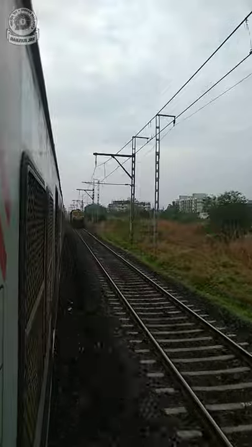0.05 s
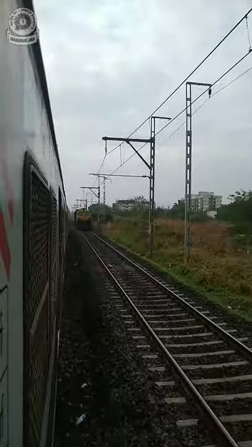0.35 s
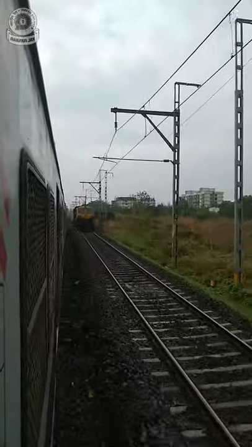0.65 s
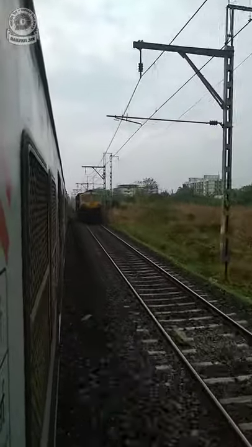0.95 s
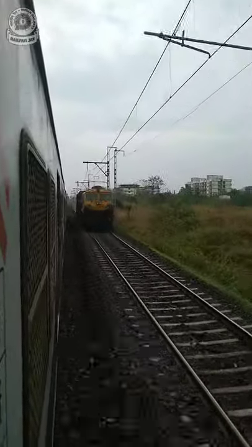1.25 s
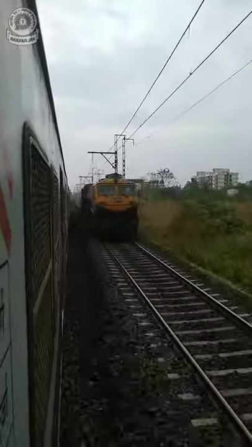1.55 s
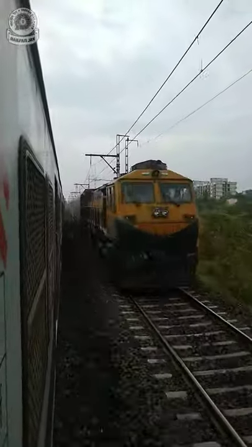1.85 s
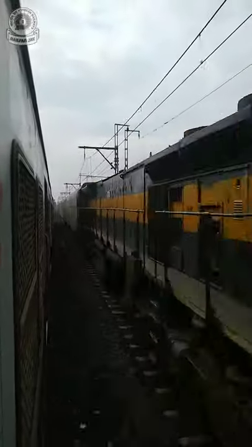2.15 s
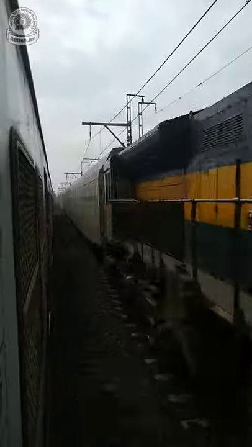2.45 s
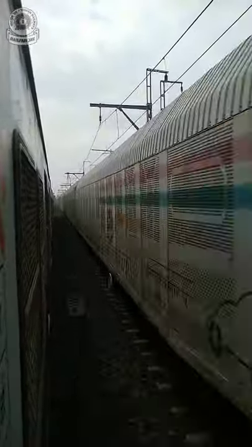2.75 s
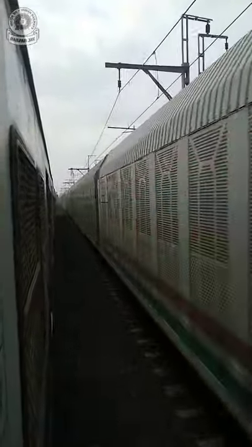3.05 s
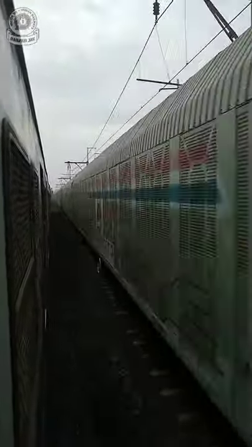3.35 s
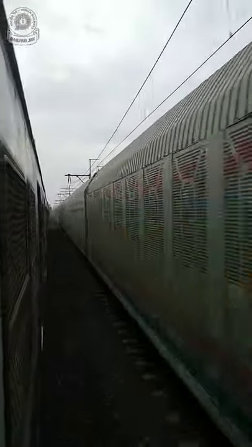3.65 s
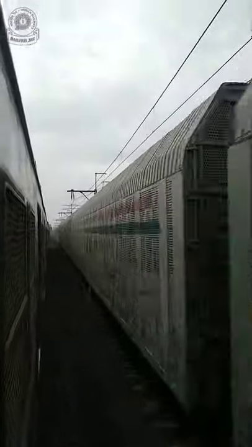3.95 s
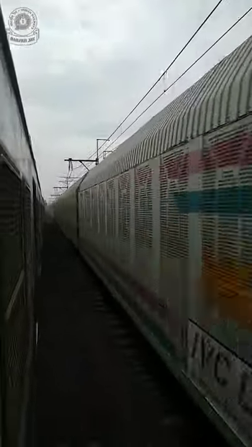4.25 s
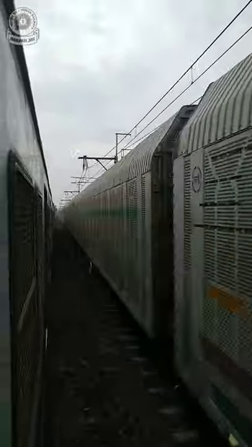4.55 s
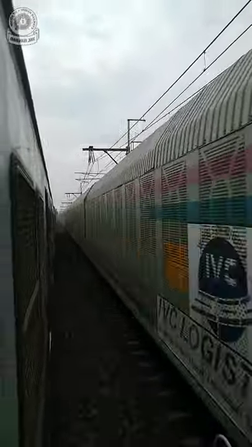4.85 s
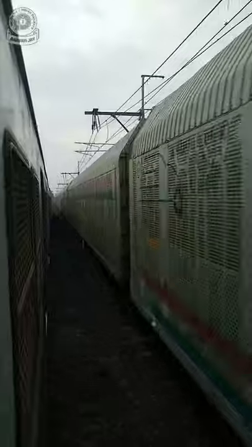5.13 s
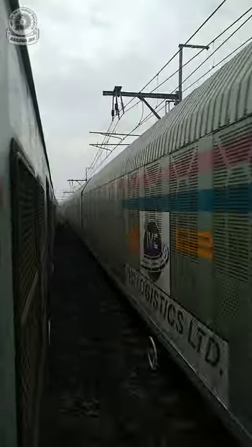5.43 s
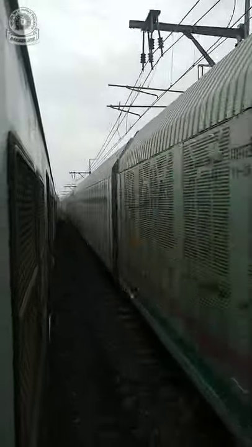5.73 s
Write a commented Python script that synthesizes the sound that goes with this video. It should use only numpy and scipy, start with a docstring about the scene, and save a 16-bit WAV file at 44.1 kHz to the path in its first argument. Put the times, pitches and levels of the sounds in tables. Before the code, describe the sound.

Low, gusty wind buffets a microphone held outside a moving train, whose wheels roar and rattle faintly underneath. About two seconds in, a diesel freight train rushes by on the next track. The locomotive's drone and fan whines drop in pitch amid brief, high wheel squeals. Its wagons follow with a pulsing roar and hiss, steel clacks and one ringing coupling clank, while the wind keeps thumping.

```python
"""Slipstream buffets two microphone ports held out of a running train, in gusts and slapping eddies.
A diesel freight train rushes by on the next track: its wheels roar and hiss on the rails, and the
locomotive's drone, its fan whines and the squealing flanges fall in pitch as each goes by.
Wheels and couplings clack, and one coupling rings. The own train roars and rattles faintly beneath.
Stereo widening puts the wind in opposite phase, and the hardest gusts are turned down."""
import sys
import numpy as np
from scipy.fft import rfft, irfft, next_fast_len
from scipy.io import wavfile
from scipy.ndimage import uniform_filter1d, map_coordinates

SR = 44100
rng = np.random.default_rng(int(sys.argv[2]) if len(sys.argv) > 2 else 0)


def wrap_up_sound(samples):
    """Save the sound to the file named by the first command line argument, as 16-bit audio."""
    columns = np.atleast_2d(samples).T
    # keep every value between -1 and 1, then stretch to whole-number steps
    tamed = np.clip(columns, -1, 1)
    steps = np.round(tamed * 32767).astype(np.int16)
    wavfile.write(sys.argv[1], SR, steps)


N = 255339
T = np.arange(N) / SR
PORT_S = 20 / 44100  # sound's travel time between the ports
NOSE_S, BUILD_S = 2.03, 0.28  # the freight train's nose draws level; its noise builds up


def amp(db):
    """Decibels to gain."""
    return 10 ** (np.asarray(db) / 20)


def along(points, hz):
    """Read a curve of (freq_hz, value) points on a log frequency axis."""
    freqs, values = np.transpose(points)
    return np.interp(np.log(hz + 1), np.log(freqs + 1), values)


def wobble(knots_per_s):
    """A smooth random curve."""
    knots = rng.standard_normal(int(N * knots_per_s / SR) + 4)
    return map_coordinates(knots, [T * knots_per_s])


def ramp(centre_s, rise_s):
    """A smooth step from 0 to 1."""
    return .5 + .5 * np.tanh(2 * (T - centre_s) / rise_s)


def envelope(start_s, length_s, attack_s=0.02, release_s=0.022):
    """Attack, hold and release of a surge or a lull."""
    return ramp(start_s, attack_s) * (1 - ramp(start_s + length_s, release_s))


def filtered(x, response):
    """Filter x by a complex response of frequency."""
    size = next_fast_len(N + SR // 4)
    return irfft(rfft(x, size) * response(np.fft.rfftfreq(size, 1 / SR)), size)[..., :N]


def coloured(x, spectrum):
    """Give x a spectrum, at rms 1."""
    shaped = filtered(x, lambda hz: amp(along(spectrum, hz)))
    return shaped / np.sqrt(np.mean(shaped ** 2) + 1e-20)


def pulses(rows, spectrum):
    """One short pulse of the given spectrum for each (time_s, level_db) row."""
    spikes = np.zeros(N)
    for time_s, db in rows:
        spikes[round(time_s * SR)] = amp(db)
    return filtered(spikes, lambda hz: amp(along(spectrum, hz)) / np.mean(amp(along(spectrum, hz))))


def from_right(x, share):
    """Place a sound to the right: it reaches the left port later, by a share of PORT_S."""
    left = filtered(x, lambda hz: np.exp(-2j * np.pi * hz * share * PORT_S))
    return np.array([left, x])


def diffuse(spectrum, lee_db=-2):
    """Noise from all sides: alike at both ports in the bass, unrelated in the treble."""
    pair = coloured(rng.standard_normal((2, N)), spectrum)
    width = lambda hz: np.arccos(np.sinc(2 * hz * PORT_S)) / 2
    mid, side = filtered(pair, lambda hz: np.array([np.cos(width(hz)), np.sin(width(hz))]))
    return np.array([mid + side, mid - side]) * amp([[lee_db], [0]])  # the coach shades the left port


# Airy microphone hiss: freq_hz, level_db
MIC_HISS_SPECTRUM = [(4000, -11.5), (9000, -11.5), (12000, 2), (15000, -2.5)]

def self_noise(level_db=-82):
    """The microphones' own faint, steady hiss."""
    return amp(level_db) * coloured(rng.standard_normal((2, N)), MIC_HISS_SPECTRUM)


# Rough stretches under the own train: start_s, length_s, roar_boost_db, rattle_boost_db
ROUGH_STRETCHES = [(0.144, .055, 6, 5), (0.395, 0.11, 10.5, 16), (0.535, 0.092, 6, 5),
                   (0.685, 0.14, 5.5, 8), (1.222, 0.087, 2, 9.5), (1.361, 0.14, 5.5, 7),
                   (1.62, 0.075, 2.5, 11), (1.788, 0.031, 11, 20), (1.838, 0.2, -1, 10.5)]

def own_wheels():
    """Gains of the own train's roar and rattle: steady, with a surge on each stretch of rough rail."""
    return amp(sum(np.outer([roar_db, rattle_db], envelope(start_s, length_s))
                   for start_s, length_s, roar_db, rattle_db in ROUGH_STRETCHES))


# Thin, bright rattle of running gear: freq_hz, level_db
RATTLE_SPECTRUM = [(1500, -15), (2600, -0.5), (3300, 4), (4400, 3.5), (5600, -5.5), (6600, -17.5),
                   (8000, -19.5), (12000, -28.5), (15000, -29.5)]

def gear_rattle(gain, level_db=-76, swing_db=2.1, grit_db=2):
    """The own train's running gear rattles faintly, in uneven gritty bursts."""
    return diffuse(RATTLE_SPECTRUM) * gain * amp(level_db + swing_db * wobble(40) + grit_db * wobble(150))


# The coupling's clank: start_s, level_db
COUPLING_HITS = [(4.606, -26)]
# Its ringing steel: pitch_hz, level_db, t60_s
COUPLING_MODES = [(2540, -3, .1), (2750, -5, 0.11), (2965, -4, .1), (3520, -5, 0.09)]

def coupling(level_db=-6, waver_rad=0.65):
    """A slack coupling is snatched tight and rings; it rattles, so each mode wavers."""
    total = np.zeros(N)
    for start_s, hit_db in COUPLING_HITS:
        age = np.maximum(T - start_s, 0)
        ring = sum(amp(db - 60 * age / t60_s) * np.sin(2 * np.pi * hz * age + waver_rad * wobble(180))
                   for hz, db, t60_s in COUPLING_MODES)
        attack = 1 - np.exp(-age / .002)
        total += amp(hit_db + level_db) * ring * attack
    return from_right(total, share=0.86)


# Knocks of wheels and couplings: start_s, level_db
CLACK_HITS = [(3.903, -35), (4.053, -32), (4.4025, -43), (4.607, -24.5), (4.745, -41.5), (4.7907, -39),
              (4.858, -29.5), (5.1114, -45.5), (5.1502, -34), (5.257, -28.5), (5.3711, -43), (5.449, -32.5),
              (5.572, -38)]
# Their hard, steely tone: freq_hz, level_db
CLACK_SPECTRUM = [(200, -8), (600, -8), (1000, -0.5), (1700, 8), (2300, 4.5), (2900, 2), (3800, -1.5),
                  (5200, -3), (8000, -15.5), (15000, -29.5)]

def clacks(level_db=-7.0, t60_s=0.12):
    """Steel knocks on steel and rattles briefly."""
    blows = np.zeros(N)
    for start_s, db in CLACK_HITS:
        age = np.maximum(T - start_s, 0)
        attack = 1 - np.exp(-age / 0.001)
        blows += amp(db + level_db - 60 * age / t60_s) * attack
    return blows * diffuse(CLACK_SPECTRUM)


def passing(rows, distance_m, flutter_db, flutter_per_s, closing_m_per_s=33):
    """Narrow bands of noise carried past: sharp on approach, flat when receding."""
    total = np.zeros(N)
    for abreast_s, pitch_hz, width_hz, db, loudest_s, spread_s in rows:
        range_m = np.hypot(closing_m_per_s * (abreast_s - T), distance_m)
        emitted_s = T - range_m / 343  # the changing travel time bends the pitch
        drift = wobble(2 * width_hz) + 1j * wobble(2 * width_hz)
        tone = drift / np.sqrt(np.abs(drift) + .1) * np.exp(2j * np.pi * pitch_hz * emitted_s)
        # each source is heard only briefly before the vehicles' bodies screen it
        swell = np.exp(-.5 * ((T - loudest_s) / spread_s) ** 2)
        total += tone.real * swell * amp(db)
    return from_right(total * amp(flutter_db * wobble(flutter_per_s)), share=0.904)


# Bursts of wheel ring and squeal: abreast_s, pitch_hz, width_hz, level_db, loudest_s, spread_s
FLANGE_SQUEALS = [(2.46, 4580, 40, -57, 2.19, .055), (2.46, 4610, 35, -49.5, 2.33, .038),
                  (2.46, 4610, 110, -47, 2.46, .03), (2.54, 7080, 330, -52, 2.49, .06),
                  (2.54, 7080, 300, -41.5, 2.555, .02), (2.54, 14100, 450, -61, 2.55, .04),
                  (2.54, 7080, 170, -48, 2.665, .025), (2.54, 7200, 200, -55, 2.83, .07),
                  (2.63, 3560, 60, -41.5, 2.63, .025), (3.06, 4760, 170, -47.5, 2.895, .025),
                  (3.06, 4760, 110, -46.5, 2.995, .022), (3.06, 4780, 170, -46.5, 3.115, .025),
                  (3.06, 4800, 130, -45.5, 3.21, .018), (3.11, 7100, 380, -59, 3.04, .05),
                  (3.41, 4790, 170, -43, 3.222, .016), (3.42, 4830, 190, -54, 3.42, .09),
                  (3.41, 4830, 130, -47, 3.395, .022), (4.75, 4780, 170, -55, 4.44, .06)]

def flanges():
    """Flanges catch and slip on the rail, so their squeals come in ragged bursts."""
    return passing(FLANGE_SQUEALS, distance_m=2.7, flutter_db=3.0, flutter_per_s=95)


# Low drone and fan whines: abreast_s, pitch_hz, width_hz, level_db, loudest_s, spread_s
ENGINE_TONES = [(2.52, 106, 35, -14.5, 2.54, .08), (2.48, 440, 11, -23.5, 2.32, .08),
                (2.79, 452, 16, -22, 2.76, .14), (2.42, 810, 35, -32.5, 2.36, .12),
                (2.8, 872, 35, -27.5, 2.8, .15), (2.82, 868, 26, -22.5, 2.775, .05),
                (2.72, 850, 22, -27.5, 2.87, .05), (2.8, 880, 16, -29.5, 3.1, .09),
                (2.44, 1320, 25, -32, 2.39, .1), (2.75, 1350, 24, -22.5, 2.8, .09),
                (2.8, 1350, 35, -27.5, 2.64, .12)]

def locomotive():
    """The exhaust drones and the cooling fans whine, high on the hood."""
    return passing(ENGINE_TONES, distance_m=4.0, flutter_db=2.5, flutter_per_s=45)


# Bogies, the locomotive's two first, then the wagons': abreast_s, spread_s, roar_db, hiss_db
BOGIE_PASSES = [(2.5, 0.2, -23, -41.5), (2.83, 0.23, -25, -42), (3.2, 0.1, -31.5, -44),
                (3.56, 0.061, -52, -47), (4.04, 0.097, -23.5, -56.5), (4.41, 0.055, -27.5, -50),
                (4.771, 0.046, -23.5, -43), (4.889, 0.029, -24.5, -51.5), (5.153, 0.013, -20.5, -45.5),
                (5.4, 0.33, -26.5, -46.5)]

def freight_wheels(bed_roar_db=-31, bed_hiss_db=-49, screened_s=0.37):
    """Gains of the freight train's roar and hiss: a steady bed once alongside, and a swell per bogie."""
    roar_power = (amp(bed_roar_db) * ramp(NOSE_S, BUILD_S)) ** 2
    # the hiss stays screened a little longer
    hiss_power = (amp(bed_hiss_db) * ramp(NOSE_S + screened_s, BUILD_S)) ** 2
    for abreast_s, spread_s, roar_db, hiss_db in BOGIE_PASSES:
        near = np.exp(-((T - abreast_s) / spread_s) ** 2)
        roar_power += near * amp(roar_db) ** 2
        hiss_power += near * amp(hiss_db) ** 2
    return np.sqrt(roar_power), np.sqrt(hiss_power)


# Bright hiss of wheel on rail: freq_hz, level_db
RAIL_HISS_SPECTRUM = [(1500, -16), (2500, -1), (3500, 4), (4300, 4), (5200, 1), (6300, -4.5), (7500, -8),
                      (9000, -17), (12000, -23), (15000, -26)]

def rail_hiss(gain, shake_db=1.33):
    """The freight train's wheels hiss on the rails."""
    return diffuse(RAIL_HISS_SPECTRUM) * gain * amp(shake_db * wobble(50))


# Midrange body of the rolling wheels: freq_hz, level_db
ROAR_SPECTRUM = [(60, -21.5), (200, -30), (450, 12.5), (650, -3.5), (830, 1.5), (1100, -5), (1450, 2.5),
                 (1900, 0), (2350, -9.5), (3200, -22), (4200, -48), (6000, -62)]

def wheel_roar(freight_gain, own_gain, own_db=-40.5, level_db=-1, shake_db=1.92, direct_db=-6):
    """Both trains' rough wheels roar all round; part comes straight from the next track's side."""
    direct = from_right(coloured(rng.standard_normal(N), ROAR_SPECTRUM), share=0.6)
    roar = diffuse(ROAR_SPECTRUM, lee_db=-6) + amp(direct_db) * direct
    gain = np.hypot(freight_gain, own_gain * amp(own_db))
    return roar * gain * amp(level_db + shake_db * wobble(35))


# Specks of flying grit: time_s, level_db
GRIT_HITS = [(1.110, -37), (1.1175, -20.5), (4.206, -30)]
# Their sharp tick: freq_hz, level_db
TICK_SPECTRUM = [(400, -2), (1400, 7), (2500, -1.5), (3600, 5.5), (4600, 7.5), (6000, -23.5), (8000, -11),
                 (10000, -26), (15000, -26.5)]

def grit():
    """Grit ticks on the housing at the exposed right port."""
    return np.array([np.zeros(N), -pulses(GRIT_HITS, TICK_SPECTRUM)])


# Single strong eddies: time_s, level_db
EDDY_HITS = [(0.153, -1), (0.18, -10.5), (0.508, -15.5), (1.1175, 0), (1.819, -21), (1.89, -5),
             (3.287, -13.5), (3.587, -20), (3.904, -4), (4.875, 4), (5.361, -6), (5.571, -4.5),
             (5.716, -11)]
# Their dull thump: freq_hz, level_db
THUMP_SPECTRUM = [(30, -14.5), (100, -4), (300, -0.5), (700, -9), (1900, -29.5), (3000, -48), (5000, -77.5)]

def eddy_slaps(level_db=2):
    """Strong eddies give the exposed right port blunt pushes."""
    return np.array([np.zeros(N), -amp(level_db) * pulses(EDDY_HITS, THUMP_SPECTRUM)])


# Gusts hit the ports: start_s, length_s, level_db
WIND_GUSTS = [(0.083, 0.039, -15.5), (0.148, 0.025, -11.5), (0.217, 0.025, -12.5), (0.274, 0.026, -11),
              (0.387, 0.062, -12), (0.46, 0.048, -15.5), (0.501, 0.024, -7), (0.539, 0.053, -15),
              (0.602, 0.085, -14.5), (0.676, 0.13, -10.5), (0.868, 0.016, -18), (0.918, 0.035, -14.5),
              (1.059, 0.035, -15.5), (1.093, 0.034, -11.5), (1.233, 0.044, -16.0), (1.283, 0.033, -13.5),
              (1.361, 0.029, -9.5), (1.472, 0.07, -14), (1.613, 0.08, -14), (1.692, 0.04, -16),
              (1.788, 0.062, -9), (1.86, 0.034, -10.5), (2.059, 0.035, -13), (2.124, 0.045, -11),
              (2.188, 0.083, -11.5), (2.3, 0.038, -16.0), (2.473, 0.104, -14), (2.603, 0.088, -8.5),
              (2.764, 0.073, -10), (2.897, 0.051, -7.5), (2.955, 0.005, -13), (3.115, 0.056, -11.5),
              (3.216, 0.043, -15), (3.27, 0.021, -5), (3.458, 0.0043, -13), (3.543, 0.026, -9),
              (3.588, 0.015, -8.5), (3.644, 0.029, -11), (3.882, 0.061, -10.5), (3.955, 0.053, -10.5),
              (4.016, 0.073, -13.5), (4.1, 0.039, -17), (4.26, 0.038, -14), (4.362, 0.07, -12.5),
              (4.425, 0.034, -8.5), (4.477, 0.012, -14.5), (4.57, 0.113, -9), (4.753, 0.032, -11.5),
              (4.862, 0.042, -10), (4.921, 0.037, -13.0), (5.001, 0.019, -9.5), (5.058, 0.0027, -12.5),
              (5.11, 0.058, -16), (5.232, 0.071, -9), (5.304, 0.076, -10.5), (5.38, 0.102, -14),
              (5.495, 0.12, -15), (5.708, 0.083, -12.5)]
# The flow lets go for a moment: start_s, length_s, depth_db
WIND_LULLS = [(0.313, 0.045, -4), (0.962, 0.06, -2.5), (1.156, 0.034, -3.5), (2.346, 0.03, -3.5),
              (3.332, 0.13, -5), (3.784, 0.07, -4.5), (5.19, 0.025, -3)]

def wind_db(open_air_db=-16.5, channel_db=3, restless_db=.8):
    """Level of a restless stream, stronger in the channel between the trains, with gusts and lulls."""
    stream = amp(open_air_db + channel_db * ramp(NOSE_S, BUILD_S) + restless_db * wobble(21.77))
    gusts = sum(amp(db) * envelope(start_s, length_s) for start_s, length_s, db in WIND_GUSTS)
    lulls_db = sum(db * envelope(start_s, length_s) for start_s, length_s, db in WIND_LULLS)
    return 20 * np.log10(np.hypot(stream, gusts)) + lulls_db


# Bass-heavy wind buffeting: freq_hz, level_db
WIND_SPECTRUM = [(20, -30), (43, -27), (65, -13), (100, -2), (165, -0.5), (250, -4.5), (400, -10.5),
                 (650, -17.5), (1000, -27.5), (1900, -31), (2400, -45), (3200, -54), (5200, -84),
                 (9000, -85.5)]

def slipstream(level_db=-1, lee_db=-6, lump_db=0.39, eddy_db=1.94, brighten=0.16, fine_hz=450):
    """Each port is buffeted by its own eddies; the left one lies in the lee."""
    gust_db = wind_db()
    shared_db = lump_db * wobble(45)
    lumps = np.array([amp(shared_db + eddy_db * wobble(260)) for port in range(2)])
    air = coloured(lumps * rng.standard_normal((2, N)), WIND_SPECTRUM)
    # harder gusts break into finer eddies and sound brighter
    fine = filtered(air, lambda hz: hz ** 2 / (hz ** 2 + fine_hz ** 2))
    air += fine * (amp(brighten * (gust_db - gust_db.mean())) - 1)
    return air * amp(gust_db + level_db) * amp([[lee_db], [0]])


def scene():
    """Pressure at the left and right microphone ports."""
    freight_roar, freight_hiss = freight_wheels()
    own_roar, own_rattle = own_wheels()
    rolling = wheel_roar(freight_roar, own_roar) + rail_hiss(freight_hiss)
    steel = gear_rattle(own_rattle) + flanges() + clacks()
    wind = slipstream() + eddy_slaps() + grit()
    return wind + rolling + steel + locomotive() + coupling() + self_noise()


def gain_control(x, ceiling_db=-6, window_s=0.0085):
    """A fast limiter turns the hardest gusts down to a common ceiling."""
    power = np.abs(uniform_filter1d(np.mean(x ** 2, axis=0), int(window_s * SR)))
    return x / (1 + (power / amp(ceiling_db) ** 2) ** 2) ** .25


# Stereo widening, how much of the other port each channel subtracts: freq_hz, share
CROSSFEED = [(100, 0.69), (1000, 0.65), (4000, 0.69), (9000, 0.79)]

def record(dry, start_s=.078, top_hz=15400):
    """Each channel subtracts the delayed other port, so wind comes out in opposite phase."""
    delay = lambda hz: np.exp(-2j * np.pi * hz * PORT_S)
    other = filtered(dry[::-1], lambda hz: np.clip(along(CROSSFEED, hz), 0, 1) * delay(hz))
    wide = gain_control((dry - other) * (T > start_s))  # cuts in after a brief silence
    rounded = wide / (1 + wide ** 6) ** (1 / 6)  # soft clipping of the peaks
    return filtered(rounded, lambda hz: hz < top_hz)


dry = scene()
out = record(dry)
wrap_up_sound(out)
```